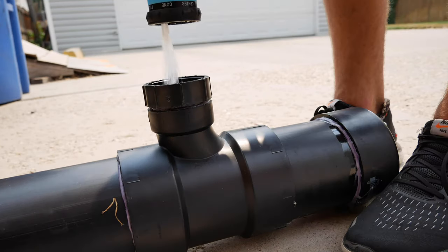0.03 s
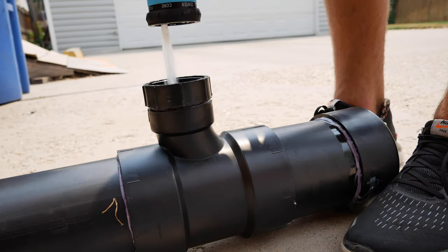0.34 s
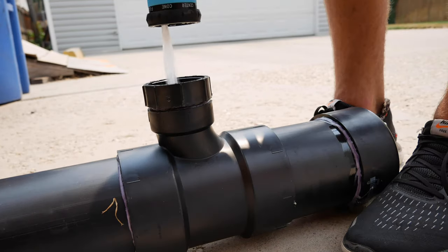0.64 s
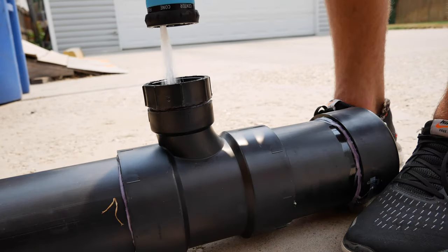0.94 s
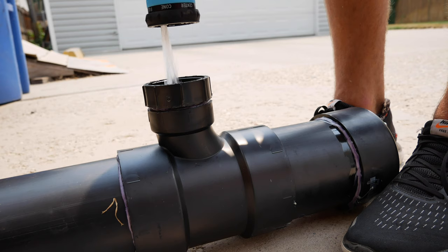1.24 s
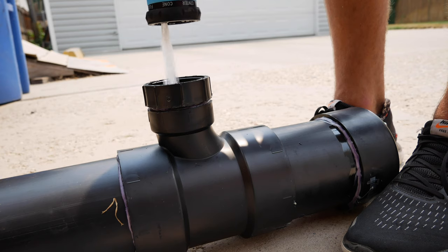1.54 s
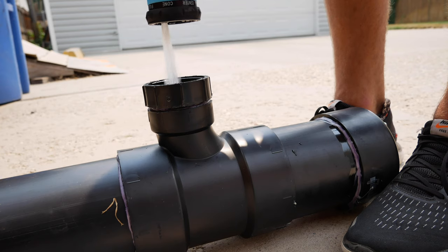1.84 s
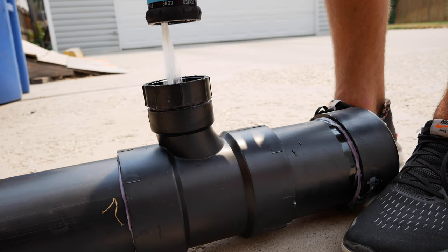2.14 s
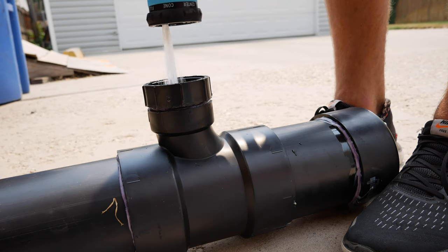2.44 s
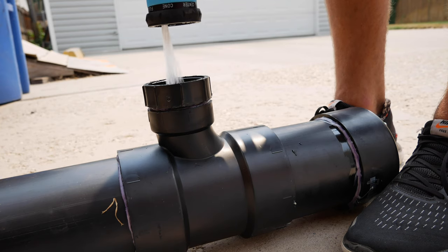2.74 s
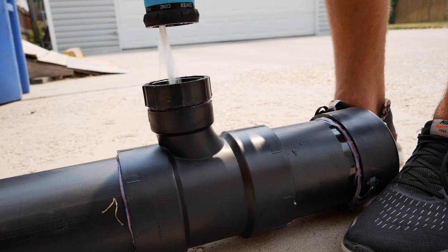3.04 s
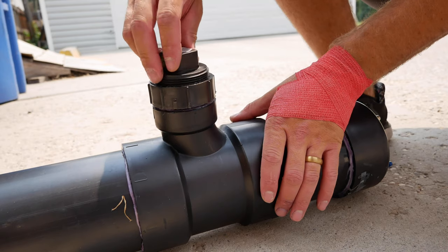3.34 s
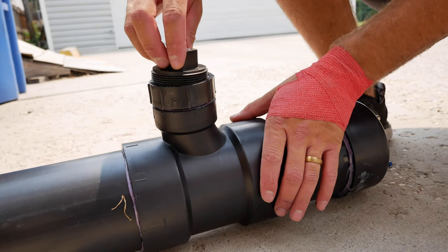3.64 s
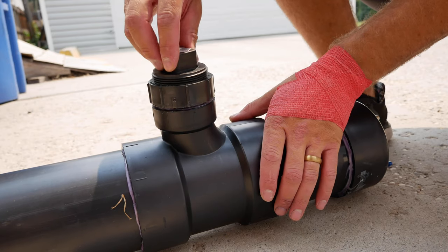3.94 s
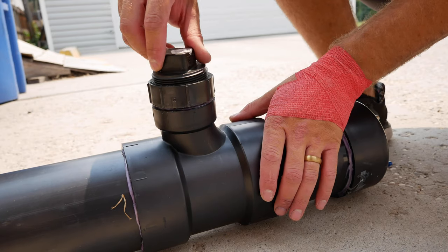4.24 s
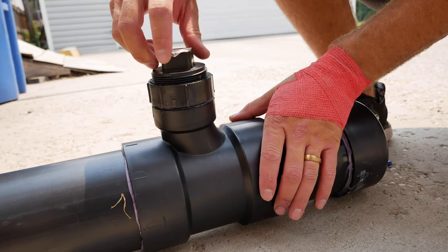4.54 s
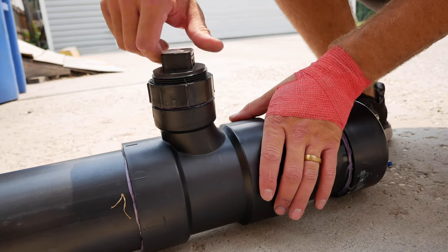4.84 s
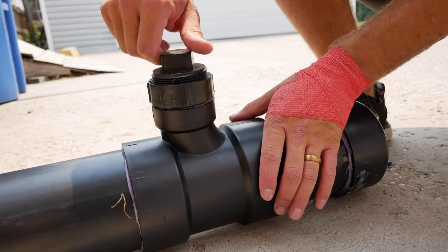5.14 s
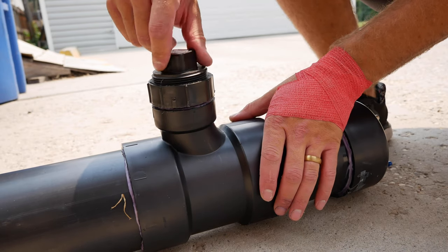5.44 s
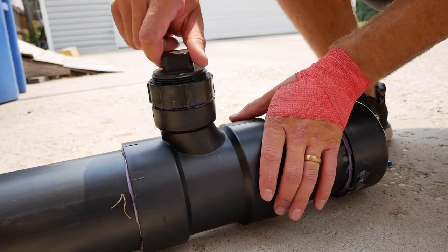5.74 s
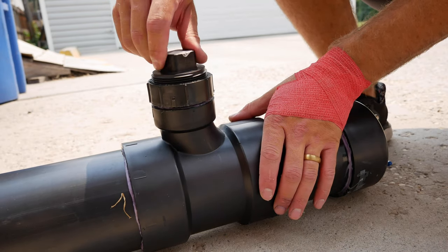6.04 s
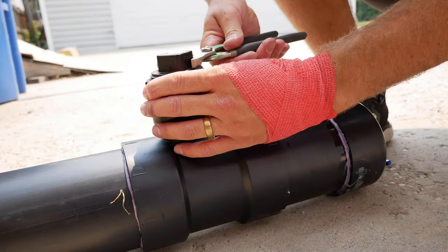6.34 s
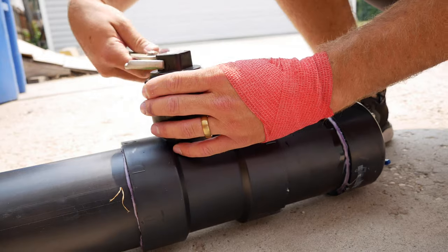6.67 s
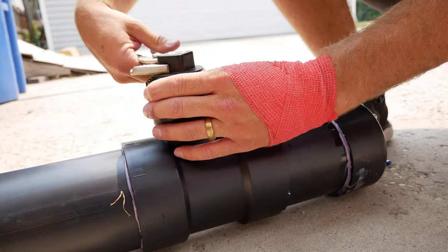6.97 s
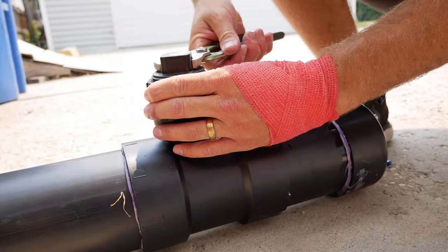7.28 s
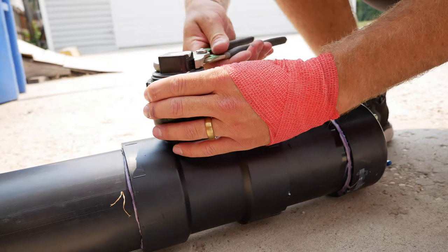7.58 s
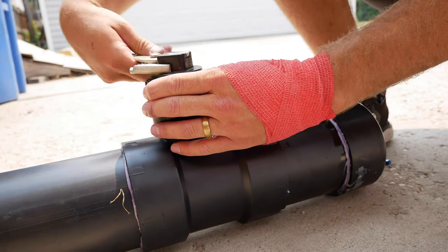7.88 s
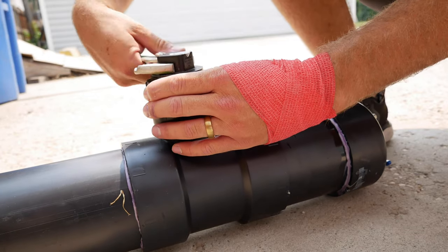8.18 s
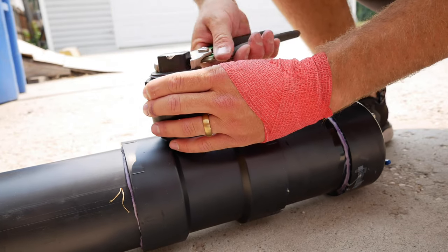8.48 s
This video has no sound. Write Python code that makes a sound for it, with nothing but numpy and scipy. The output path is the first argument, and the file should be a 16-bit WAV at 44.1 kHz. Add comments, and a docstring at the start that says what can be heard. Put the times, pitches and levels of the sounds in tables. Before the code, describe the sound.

On a driveway, a hose jet pours into a plastic pipe with hollow, ringing splashes and fizzing spray. It stops suddenly. A plastic plug knocks sharply into the opening and the water inside glugs briefly. Fingers twist the plug with short rubs, ticks and squeaks, then a wrench tightens it with light clinks. The work is close and straight ahead, over quiet street rumble and a far engine's drone.

```python
"""On a driveway, a hose jet fills a plastic pipe tank. Drops and bubbles make the air in the pipe ring,
and spray fizzes at the neck. The jet stops suddenly and the water laps. A threaded plug knocks into
the neck, rubs and squeaks as fingers twist it in, and is tightened with a clinking wrench.
The street rumbles quietly throughout; once the jet has stopped, an engine drones far off."""
import sys
import numpy as np
from scipy import signal
from scipy.fft import rfft, irfft
from scipy.io import wavfile
from scipy.ndimage import uniform_filter1d

SR = 44100
rng = np.random.default_rng(int(sys.argv[2]) if len(sys.argv) > 2 else 0)


def int16_out(signal):
    """Quantize to a 16-bit WAV file."""
    q = np.round(np.clip(np.atleast_2d(signal).T, -1, 1) * 32767)
    wavfile.write(sys.argv[1], SR, q.astype(np.int16))


N = 379701
T = np.arange(N) / SR
FILTER_HZ = np.fft.rfftfreq(16384, 1 / SR) + 1e-3
JET_END_S = 3.175

# Tone of the street's hiss: pitch_hz, gain_db
STREET_HISS = [(150, -24.5), (300, -2.5), (430, -4.5), (580, -8.5), (1020, -9.5), (1400, -12.5),
               (1900, -21), (2600, -23), (3100, -30.5), (4600, -34), (5500, -32), (7000, -38.5),
               (9000, -37.5), (10500, -44), (15500, -71)]
# Tone of its rumble: pitch_hz, gain_db
STREET_RUMBLE = [(20, -24.5), (35, -2.5), (52, 1.5), (85, -1), (130, -0.5), (190, -5), (230, -0.5),
                 (300, -11), (400, -13.5), (800, -53.5)]
# Tone of street noise from all around: pitch_hz, gain_db
STREET_AROUND = [(60, -18), (150, -16), (300, -5), (1000, 1), (3000, -1.5), (6000, -2), (15500, -7.5)]
# How fast the far engine fires: time_s, rate_hz
ENGINE_FIRING = [(3.2, 121.7), (3.3, 116.8), (4.13, 111.3), (5.58, 130), (8.34, 130.5), (8.61, 126)]
# How its drone swells: time_s, level_db
DRONE_LEVELS = [(4.36, -45), (4.6, -36), (4.92, -28.5), (5.0, -35), (5.1, -32.5), (5.25, -31), (5.52, -36),
                (5.93, -33.5), (6.0, -42.5), (6.3, -26.5), (6.45, -25.5), (6.58, -21), (6.76, -22),
                (6.86, -26.5), (6.96, -22), (7.05, -27.5), (7.15, -23), (7.26, -29), (7.35, -23),
                (7.47, -21.5), (7.56, -29), (7.7, -23.5), (7.85, -39), (7.92, -30), (8.07, -29), (8.2, -31),
                (8.28, -43), (8.48, -26.5), (8.61, -36)]
# How its deeper tone swells: time_s, level_db
UNDERTONE_LEVELS = [(3.65, -51), (3.9, -39.5), (4.3, -49), (5.05, -53), (5.7, -53), (8.6, -48)]
# Modes (pitches at which a thing rings) of its dull roar: pitch_hz, width_hz, gain_db
ROAR_MODES = [(218.6, 27, 12), (420, 530, 1.5)]

# Ringing of the plug's thin walls: pitch_hz, width_hz, gain_db
WALL_MODES = [(2230, 330, -3.5), (3450, 495, -7), (5450, 260, -0.5), (6250, 300, -5), (7860, 220, 3),
              (8950, 340, -1), (12000, 760, -12), (13100, 400, -14), (15200, 400, -13)]
# Fingers twist the plug: start_s, length_s, end_level_db
HAND_TWISTS = [(3.429, 0.035, -55), (3.843, 0.061, -56), (4.12, 0.05, -53.5), (4.242, 0.19, -39.5),
               (4.6, 0.023, -57), (4.703, 0.093, -38.5), (5.068, 0.053, -38.5), (5.127, 0.025, -38.5),
               (5.364, 0.026, -46), (5.419, 0.013, -39.5), (5.71, 0.011, -36.5), (5.73, 0.023, -42),
               (5.8, 0.059, -43), (5.93, 0.045, -52), (6.092, 0.017, -36.5), (6.113, 0.027, -44)]
# Tone of plastic rubbing on plastic: pitch_hz, gain_db
RUB_TONE = [(300, 9.5), (700, 9), (1500, 6.5), (3000, -5), (4700, -3), (6000, -2.5), (7000, -3.5),
            (7800, -2.5), (9400, 0.5), (10200, -6), (11300, -14), (13000, -7), (15500, -16)]
# Slow turns under the wrench: middle_s, half_length_s, level_db
WRENCH_TURNS = [(7.28, 0.14, -55), (8.45, 0.18, -54)]
# Tone of their soft hiss: pitch_hz, gain_db
TURN_HISS = [(1200, -10), (2500, 2), (4000, 4), (5500, 2.5), (6800, -3), (8000, 1), (8900, 4), (10500, -10),
             (11500, -10), (13500, -9), (15500, -15)]
# Faint squeals of the thread: middle_s, half_length_s, level_db
THREAD_SQUEALS = [(3.215, 0.033, -58), (6.572, .05, -56.5)]
# Ringing in those squeals: pitch_hz, width_hz, gain_db
THREAD_MODES = [(3950, 350, -3), (5450, 220, 1), (6100, 400, -11)]
# Fingertip squeaks: start_s, length_s, first_hz, last_hz, level_db
FINGER_SQUEAKS = [(4.402, 0.06, 2560, 1415, -45), (5.065, .016, 1750, 1550, -45),
                  (5.128, 0.016, 2667, 2150, -40.5), (5.134, 0.02, 2020, 1760, -50),
                  (5.714, 0.014, 2270, 1900, -41), (5.729, 0.035, 1490, 1820, -45),
                  (5.806, 0.017, 1540, 1820, -47), (5.838, 0.016, 1330, 1630, -43),
                  (6.09, 0.012, 1120, 1250, -45), (6.106, 0.024, 2050, 2290, -41)]
# The plug knocks and ticks: start_s, ring_db, crack_db, crack_hz
PLUG_KNOCKS = [(3.2735, -10, -16, 1000), (3.2801, -12.5, -20.5, 890), (3.3435, -32, -39, 2430),
               (3.4988, -48, -44, 5500), (3.5906, -60, -43, 8140), (3.6123, -37, -51, 4800),
               (3.7122, -37, -43, 5170), (4.0561, -37, -43.5, 7660), (4.7475, -55, -25.5, 298),
               (4.749, -40, -22, 694), (4.7505, -48, -25.5, 1270), (5.109, -40, -28.5, 870),
               (5.1505, -38, -33.5, 3700), (5.713, -49, -36, 2720), (5.977, -34, -29.5, 1650),
               (5.977, -50, -40, 6800), (6.142, -43, -46, 7000)]
# Ringing of the plug in its socket: pitch_hz, gain_db, fade_s
PLUG_MODES = [(900, 1, 0.031), (1116, -2.5, 0.028), (1400, -12, 0.033), (1590, -2, 0.016),
              (2220, -13, 0.029), (3330, -28, 0.011), (4110, -19, 0.03), (5490, -23, 0.022),
              (5990, -21, 0.033), (7980, -27, 0.022), (8800, -20, 0.024)]
# The wrench clinks: start_s, ring_db, crack_db, crack_hz
WRENCH_CLINKS = [(6.8038, -36, -35.5, 2450), (6.860, -41, -40, 1010), (6.9355, -42, -49, 2170),
                 (7.7066, -26.5, -27.5, 1300), (7.7098, -34, -33, 8100), (7.928, -44, -41, 1080),
                 (7.9562, -38, -53, 2450), (7.9608, -43, -43, 2080), (8.1961, -46, -50, 4000)]
# Ringing of the wrench against the plug: pitch_hz, gain_db, fade_s
WRENCH_MODES = [(730, 5, 0.033), (973, 5.5, 0.022), (1470, -5, 0.044), (1790, -2, 0.043), (2050, 3, 0.022),
                (2380, 1.5, 0.015), (2640, -12, 0.044), (3200, -20, 0.04), (4070, -9, 0.018),
                (5800, -24, 0.048), (7250, -26, 0.02), (8300, -27, 0.02)]

# Bubbles of the lapping water: start_s, pitch_hz, level_db
LAP_BUBBLES = [(3.318, 720, -25), (3.357, 696, -19), (3.374, 483, -19.5), (3.592, 474, -28),
               (3.618, 505, -26.5), (3.741, 510, -22), (3.789, 490, -26), (3.879, 447, -21),
               (4.06, 268, -27)]
# Hoots of the air in the pipe: start_s, length_s, pitch_hz, level_db
PIPE_HOOTS = [(-.08, 0.4, 142.6, -39), (.47, 0.35, 220.4, -42.5), (1.0, 0.32, 216.4, -37.5),
              (1.55, 0.47, 126.8, -45), (1.98, 0.48, 215.9, -38.5), (2.08, 0.31, 140.8, -36.5),
              (2.5, 0.63, 143, -38.5), (2.64, 0.56, 214.6, -41)]
# Air ringing across the pipe: pitch_hz, width_hz, first_level_db, change_db_per_s
CROSS_MODES = [(1686, 45, -48, 1.5), (3205, 60, -53, 1.5), (4070, 40, -45.5, -1.4)]
# Lowest modes of the air in the long pipe: pitch_hz, width_hz, gain_db
LOW_AIR_MODES = [(49, 47, -8.5), (135, 22, -3.5), (214.4, 30, -1.5), (292, 80, -6), (339, 17, -8),
                 (457.7, 15, -6.5), (565, 73, -11.5)]
# Higher modes along and across the pipe: pitch_hz, width_hz, gain_db
HIGH_AIR_MODES = [(649, 20, -1.5), (744, 27.4, 4.5), (833, 34, 1.5), (926, 18, 1.5), (1008, 42, -3),
                  (1100, 230, -7.5), (1270, 16, -0.5), (1352, 16, 6), (1440, 74, 1.5), (1560, 63, -5),
                  (1655, 35, 2.5), (1738, 22, 0), (2050, 70, -9), (2194, 41, -3), (2280, 43, -1.5),
                  (2372, 46, 3), (2486, 80, 1), (2680, 180, .5), (2803, 48, -3), (2960, 33, -2.5),
                  (3190, 81, 1), (3260, 50, -4), (3390, 89, -4), (3620, 170, -1), (3850, 91, -9.5),
                  (4065, 100, -2), (4530, 110, -12), (4660, 51, -13), (5075, 71, -3.5), (5370, 340, -7.5)]
# How the splash changes from empty pipe to full: pitch_hz, change_db
FILL_CHANGE = [(750, -6), (1100, -0.5), (1400, 0), (1680, 4), (1900, -2), (2350, 5.5), (2600, -2.5),
               (3200, 2.5), (3700, -5), (4100, -2), (5200, -5.5)]
# Tone of the spray at the open neck: pitch_hz, gain_db
SPRAY_TONE = [(300, -13), (1900, -1.5), (3000, -2), (4750, -6.5), (5300, -4.5), (6400, -4.5), (7800, 1),
              (8600, 0), (9050, 3), (10000, -3), (11300, -7), (13000, -5), (15500, -9)]
# Tone of splatter from all around: pitch_hz, gain_db
SPLATTER_TONE = [(30, -1), (200, 2), (400, -2), (2800, -2.5), (6000, -4), (15500, -7.5)]


def gain(db):
    """Turn decibels into a number to multiply by."""
    return 10 ** (np.asarray(db) / 20)


def unit(x):
    """Scale a sound to an average strength (rms) of 1."""
    return x / np.sqrt(np.mean(x ** 2))


def curve(points):
    """Join (time, value) points with straight lines."""
    return np.interp(T, *np.transpose(points))


def wander(per_s):
    """A smooth random wobble of size about 1, changing so many times a second."""
    hold = int(SR / per_s)
    steps = np.repeat(rng.standard_normal(N // hold + 1), hold)
    return unit(uniform_filter1d(uniform_filter1d(steps, hold), hold)[:N])


def swell(middle_s, half_s):
    """A smooth rise to 1 and fall."""
    return np.exp(-np.minimum(((T - middle_s) / half_s) ** 2, 50) / 2)


def fade(t, fade_s):
    """Die away by 60 dB in fade_s seconds."""
    return np.exp(-np.log(1000) * t / fade_s)


def tone(points):
    """A filter shape that joins (pitch, gain) points."""
    hz, db = np.transpose(points)
    return gain(np.interp(np.log(FILTER_HZ), np.log(hz), db))


def peaks(modes, steepness):
    """A filter shape with one peak for each mode."""
    return np.sqrt(sum(gain(db) ** 2 / (1 + (2 * (FILTER_HZ - hz) / width) ** 2 / steepness) ** steepness
                       for hz, width, db in modes))


def colour(x, shape):
    """Filter a sound so that each click rings after it lands, never before; strength 1."""
    cepstrum = irfft(np.log(shape + 1e-6))
    half = len(cepstrum) // 2
    click_response = irfft(np.exp(rfft(2 * cepstrum[:half], 2 * half)))[:half]
    return unit(signal.oaconvolve(x, click_response)[:len(x)])


def noise(shape):
    """Steady noise with this filter shape; strength 1."""
    return colour(rng.standard_normal(N), shape)


def add(out, start_s, sound):
    """Mix a sound in at its start time."""
    i = int(start_s * SR)
    out[i:i + len(sound)] += sound[:max(N - i, 0)]


def clicks(per_s, spread_db):
    """Tiny random hits of uneven size; strength 1."""
    hits = (rng.random(N) < per_s / SR) * rng.choice([-1, 1], N)
    return unit(hits * gain(spread_db * np.minimum(rng.exponential(size=N), 5)))


def bubble(hz, cycles, glide, rise_cycles=0.13):
    """A bubble swells, then rings away, rising in pitch as it nears the surface."""
    life_s = cycles / hz
    t = T[:int(life_s * SR)]
    ring = np.sin(2 * np.pi * hz * t * (1 + glide * t / life_s / 2))
    return ring * fade(t, life_s) * (1 - np.exp(-hz * t / rise_cycles))


def pings(low_hz, high_hz, cycles, spread_db, count, start_s=0, end_s=JET_END_S):
    """A cloud of short rings of random pitch and size; strength 1 while it lasts."""
    out = np.zeros(N)
    for when, pitch, size in rng.random((count, 3)):
        ping = bubble(low_hz * (high_hz / low_hz) ** pitch, cycles, glide=0.11)
        add(out, start_s + when * (end_s - start_s), gain(-spread_db * np.log(max(size, .02))) * ping)
    return unit(out) * np.sqrt((end_s - start_s) / T[-1])


def echoes(x, fade_s):
    """Dense echoes that die away, about as strong in all as the sound itself."""
    t = T[:SR // 4]
    tail = rng.standard_normal(len(t)) * fade(t, fade_s)
    return signal.oaconvolve(x, tail / np.linalg.norm(tail))[:N]


def driveway(x, echo_db, fade_s):
    """Add faint, dull echoes from the ground and the house front."""
    dull = signal.butter(1, 5000, fs=SR, output="sos")
    return x + gain(echo_db) * signal.sosfilt(dull, echoes(x, fade_s))


def street():
    """Distant traffic: a smooth hiss over a restless rumble."""
    hiss = noise(tone(STREET_HISS)) * gain(-42.5 + .5 * wander(4.6))
    rumble = noise(tone(STREET_RUMBLE)) * gain(-38.5 + 1.6 * wander(4.1))
    return hiss + rumble


def engine():
    """Only the lowest exhaust tones carry this far, wavering on the way; a low hum joins them."""
    undertone_ratio, hum_hz, hum_start_s = .556, 48.7, 6.1
    drone_db = curve(DRONE_LEVELS)
    phase = 2 * np.pi * np.cumsum(curve(ENGINE_FIRING)) / SR
    drone = np.sin(phase + 0.057 * wander(29)) * gain(drone_db - 0.33 + 1.04 * wander(22))
    undertone = np.sin(undertone_ratio * phase + 0.25 * wander(12))
    undertone *= gain(curve(UNDERTONE_LEVELS) + 2 * wander(3.1))
    hum = np.sin(2 * np.pi * hum_hz * T + .4 * wander(13)) * gain(-45.5 + 2 * wander(7.3))
    hum *= np.clip((T - hum_start_s) / .1, 0, 1)
    roar = noise(peaks(ROAR_MODES, steepness=2.2)) * gain(drone_db - 20)
    return (np.sqrt(2) * (drone + undertone + hum) + roar) * (T > JET_END_S)


def fingers():
    """Skin rustles faintly on the plug and rings its walls, unevenly as the grip shifts."""
    start_s, end_s, grips_per_s = 2.5, 6.3, 20
    rustle = colour(clicks(per_s=1600, spread_db=6), peaks(WALL_MODES, steepness=0.78))
    return rustle * gain(-67.5 + 3.5 * wander(grips_per_s)) * (T > start_s) * (T < end_s)


def twist(length_s):
    """Strength of one twist: it bites, grows as the fingers press on, and dies when they let go."""
    bite_share, growth_db_per_s, release_s = 0.24, 70, 0.12
    t = T[:int((length_s + release_s) * SR)]
    bite = np.minimum(t / (bite_share * length_s), 1)
    growth = gain(growth_db_per_s * np.minimum(t - length_s, 0))
    return bite * growth * fade(np.maximum(t - length_s, 0), release_s)


def thread():
    """The thread catches and slips in each twist, ringing the plug; under the wrench it hisses."""
    slips = clicks(per_s=1700, spread_db=-0.5) * gain(0.9 * wander(200))
    rub = colour(slips, tone(RUB_TONE))
    ring = gain(-5.5) * colour(slips, peaks(WALL_MODES, steepness=1.6))
    # while the plug is loose, grit catches in the wet thread
    grit = gain(-6) * pings(1500, 7500, cycles=28, spread_db=3.2, count=1300, start_s=4.2, end_s=6.2)
    twists = np.zeros(N)
    for start_s, length_s, db in HAND_TWISTS:
        add(twists, start_s, gain(db) * twist(length_s))
    turns = sum(gain(db) * swell(middle_s, half_s) for middle_s, half_s, db in WRENCH_TURNS)
    squeals = sum(gain(db) * swell(middle_s, half_s) for middle_s, half_s, db in THREAD_SQUEALS)
    hiss = turns * noise(tone(TURN_HISS))
    squeal = squeals * noise(peaks(THREAD_MODES, steepness=1.5))
    return twists * unit(rub + ring + grit) + hiss + squeal


def squeaks():
    """Skin sticks and slips on the plug: a rough, gliding tone with overtones."""
    out, overtone_step_db = np.zeros(N), -11
    jitter = 1 + 0.052 * wander(900)
    roughness = gain(1.8 * wander(500))
    for start_s, length_s, first_hz, last_hz, db in FINGER_SQUEAKS:
        envelope = signal.windows.tukey(int(length_s * SR), 0.31)
        span = slice(int(start_s * SR), int(start_s * SR) + len(envelope))
        hz = np.geomspace(first_hz, last_hz, len(envelope)) * jitter[span]
        phase = 2 * np.pi * np.cumsum(hz) / SR
        squeak = sum(gain(overtone_step_db * k) * np.sin((k + 1) * phase) for k in range(5))
        add(out, start_s, gain(db) * envelope * roughness[span] * unit(squeak))
    return out


def knocks(blows, modes):
    """Each blow is a short crack where the parts meet, and a ring of the part that is struck."""
    out, t = np.zeros(N), T[:SR // 5]
    ring = sum((-1) ** k * gain(db) * np.sin(2 * np.pi * hz * t) * fade(t, fade_s)
               for k, (hz, db, fade_s) in enumerate(modes))
    treble_cut = np.hypot(1, (FILTER_HZ / 11000) ** 4)
    for start_s, ring_db, crack_db, hz in blows:
        band = 1 / np.hypot(1, 6.5 * (FILTER_HZ / hz - hz / FILTER_HZ)) / treble_cut
        decay = fade(t, 0.044 * (1000 / hz) ** 0.29)  # harder, higher cracks die sooner
        crack = unit(colour(rng.standard_normal(len(t)), band) * decay) * np.std(decay)
        add(out, start_s, gain(ring_db) * ring + gain(crack_db) * crack)
    return out


def glugs():
    """The stirred-up water laps in the closed pipe, one bubble to a glug."""
    out = np.zeros(N)
    for start_s, hz, db in LAP_BUBBLES:
        add(out, start_s, gain(db) * bubble(hz, cycles=16.7, glide=0.059, rise_cycles=0.85))
    return out


def hoots():
    """The jet catches low modes of the air in the pipe: hollow, unsteady tones come and go."""
    out = np.zeros(N)
    drift = 1 + 0.0077 * wander(10.8)
    flutter = gain(0.71 * wander(22.5))
    for start_s, length_s, hz, db in PIPE_HOOTS:
        span = (T > start_s) & (T < start_s + length_s)
        envelope = np.sqrt(np.abs(np.sin(np.pi * (T[span] - start_s) / length_s)))
        phase = 2 * np.pi * np.cumsum(hz * drift[span]) / SR
        out[span] += np.sqrt(2) * gain(db) * envelope * flutter[span] * np.sin(phase)
    return out


def singing():
    """Splashes keep the air ringing across the pipe; the heaving water bends its pitch."""
    out = np.zeros(N)
    for hz, width_hz, first_db, db_per_s in CROSS_MODES:
        phase = 2 * np.pi * np.cumsum(hz * (1 + .008 * wander(7))) / SR
        db = first_db + db_per_s * np.minimum(T, JET_END_S) + 3.1 * wander(7.94)
        out += gain(db) * (wander(2 * width_hz) * np.cos(phase) + wander(2 * width_hz) * np.sin(phase))
    return out


def churn():
    """Churning water stirs the pipe's lowest modes, swelling as it sloshes to and fro."""
    period_s, first_crest_s = 0.535, 0.031
    slosh = np.cos(2 * np.pi * (T - first_crest_s) / period_s)
    return noise(peaks(LOW_AIR_MODES, steepness=1.73)) * gain(-38 + 0.5 * slosh)


def splash():
    """Drops and bubbles ring the pipe's air; the sound grows and changes tone as the water rises."""
    surge_db = 1.1 * swell(middle_s=1.26, half_s=0.2)
    level_db = -30 + .5 * T + surge_db + 0.83 * wander(8.98)
    drops = clicks(per_s=3600, spread_db=3)
    bubbles = gain(-10.5) * pings(1450, 4550, cycles=21, spread_db=3, count=1500)
    hits = (drops + bubbles) * gain(1.2 * wander(200))
    pipe = peaks(HIGH_AIR_MODES, steepness=1.31)
    change = np.sqrt(tone(FILL_CHANGE))
    filled = np.minimum(T / JET_END_S, 1)
    ringing = (1 - filled) * colour(hits, pipe / change) + filled * colour(hits, pipe * change)
    return ringing / np.std(ringing[T < JET_END_S]) * gain(level_db)


def spray():
    """Fine drops crackle and tiny bubbles ping in the neck; strength 1 while the jet runs."""
    bubbles = gain(-7) * pings(4250, 15000, cycles=90, spread_db=2.5, count=5000)
    drops = clicks(per_s=9000, spread_db=1.5)
    flicker = gain(wander(130) + 0.32 * wander(12.75))
    fizz = colour((drops + bubbles) * flicker, tone(SPRAY_TONE))
    return fizz / np.std(fizz[T < JET_END_S])


def jet():
    """The hose jet hits the water until it is shut off: the sound ahead, and splatter all around."""
    spray_db = -28.5 - 0.61 * T  # the spray weakens as the water rises
    ahead = churn() + splash() + spray() * gain(spray_db) + hoots() + singing()
    around = colour(clicks(per_s=9800, spread_db=-4), tone(SPLATTER_TONE)) * gain(spray_db - 18.5)
    running = np.clip((JET_END_S - T) / 0.002, 0, 1)
    return running * np.array([ahead, around])


def scene():
    """All is straight ahead; only splatter, some street noise and short echoes spread left and right."""
    water, splatter = jet()
    blows = knocks(PLUG_KNOCKS, PLUG_MODES) + knocks(WRENCH_CLINKS, WRENCH_MODES)
    handling = blows + glugs() + thread() + squeaks() + fingers()
    middle = water + driveway(handling, echo_db=-13.5, fade_s=0.4) + engine() + street()
    side = splatter + gain(-69.5) * noise(tone(STREET_AROUND)) + gain(-28) * echoes(handling, fade_s=0.11)
    return np.array([middle + side, middle - side])


def record(dry):
    """Round off the loudest peaks and cut the highest treble."""
    top_hz = 15600
    rounded = np.tanh(1.183 * dry) / 1.208
    return signal.sosfilt(signal.ellip(10, .2, 80, top_hz, fs=SR, output="sos"), rounded)


dry = scene()
out = record(dry)
int16_out(out)
```